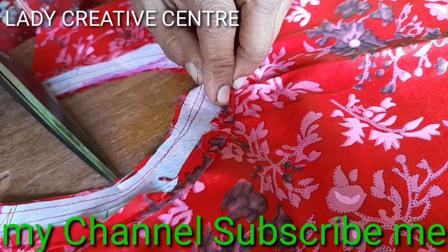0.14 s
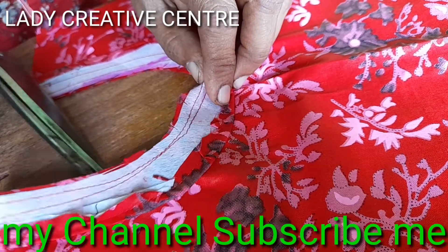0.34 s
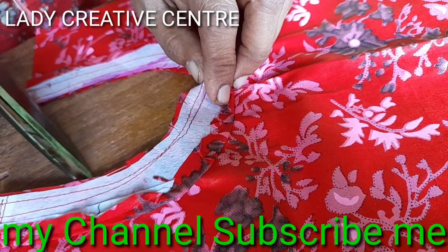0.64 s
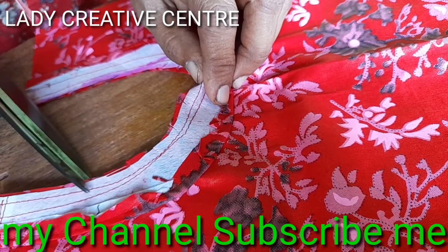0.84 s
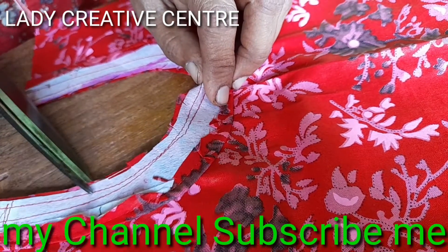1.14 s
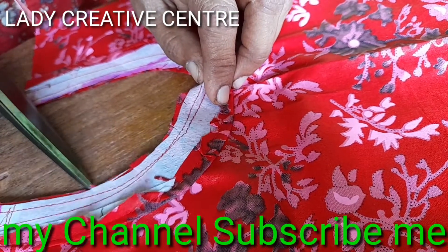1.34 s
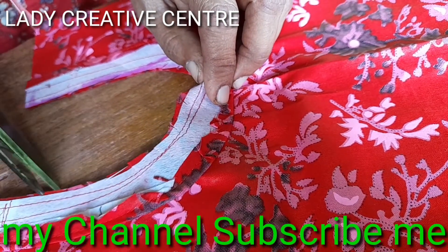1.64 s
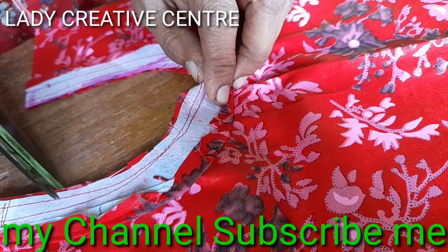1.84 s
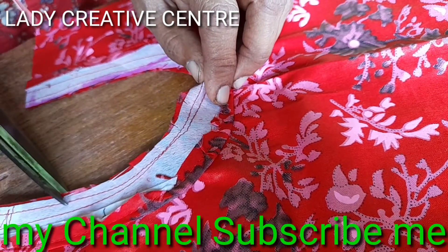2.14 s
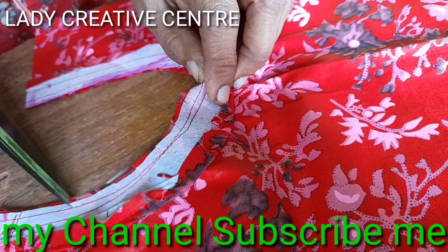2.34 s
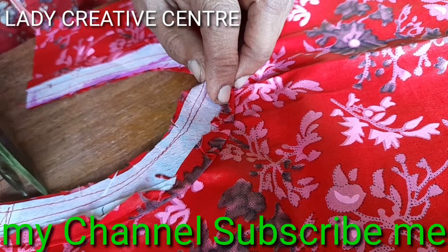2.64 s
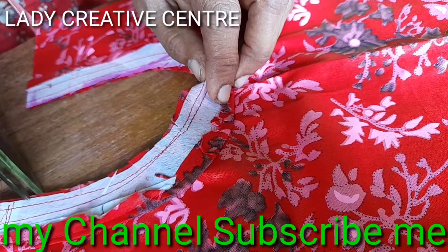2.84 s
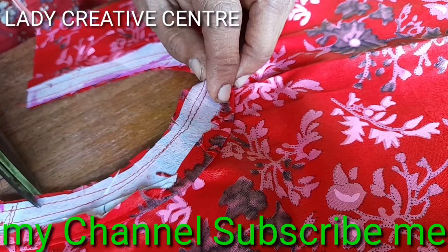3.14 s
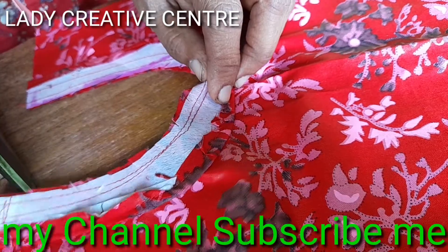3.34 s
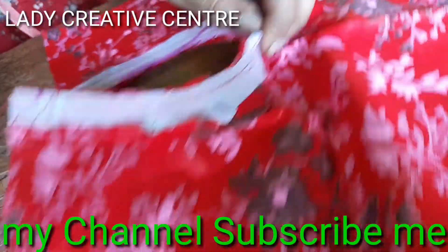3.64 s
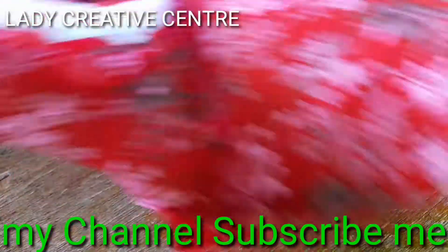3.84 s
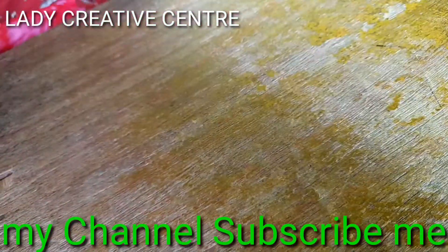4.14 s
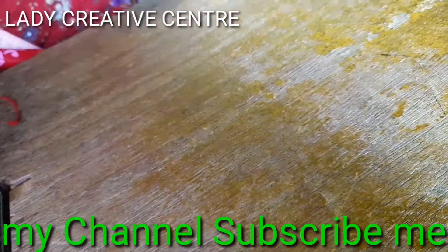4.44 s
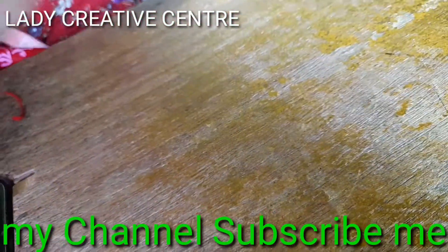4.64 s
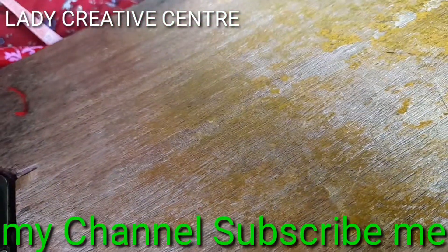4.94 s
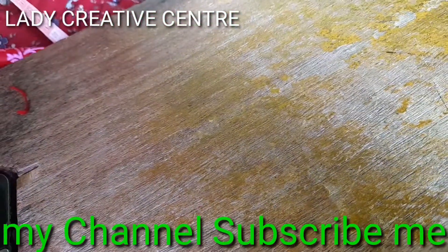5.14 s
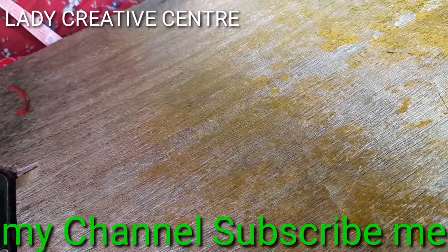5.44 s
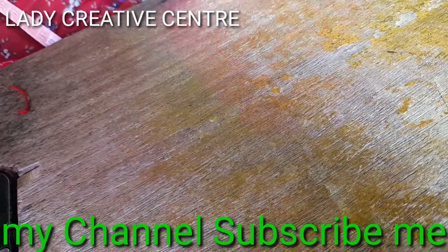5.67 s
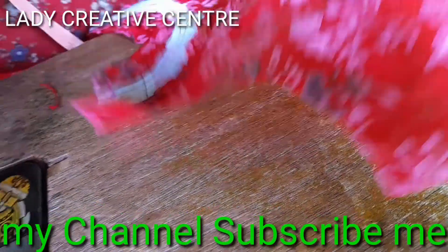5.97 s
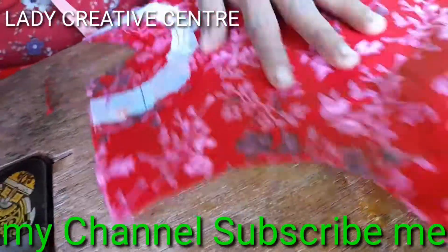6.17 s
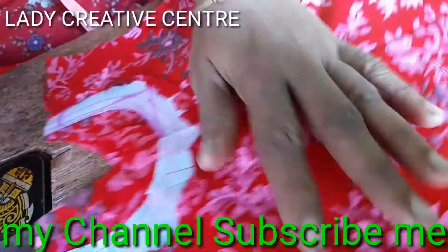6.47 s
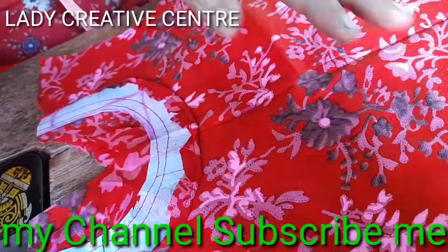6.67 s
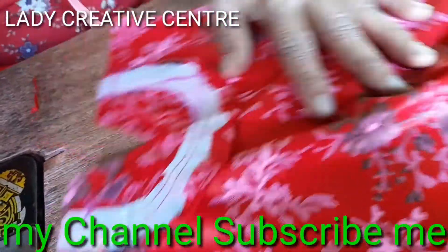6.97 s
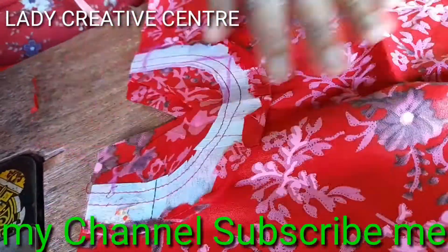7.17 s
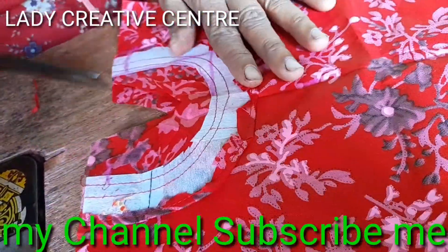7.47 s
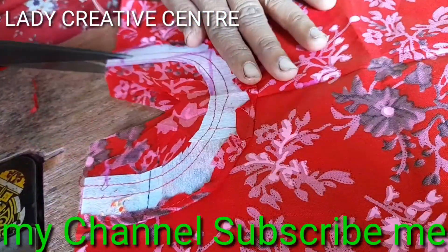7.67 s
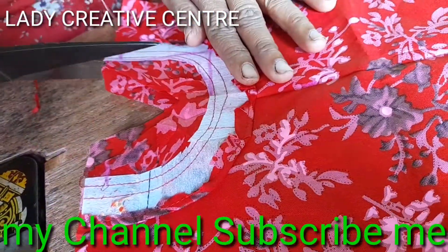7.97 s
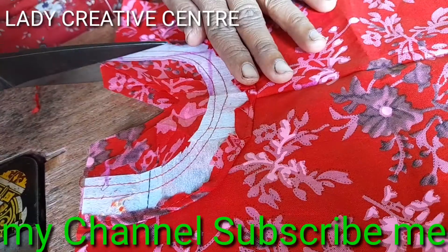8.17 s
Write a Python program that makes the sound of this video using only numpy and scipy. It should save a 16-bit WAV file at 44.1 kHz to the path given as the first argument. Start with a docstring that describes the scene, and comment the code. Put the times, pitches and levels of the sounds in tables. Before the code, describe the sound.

Scissor blades scrape and knock on a resonant wooden table top while cotton threads part in bright crackling bursts. Dull knocks dominate at first, under a thin faint whine; sharper, louder snips come in the middle after a short pause. Then near quiet, fabric brushing and smoothing, and two more snaps with a knock. Heard very close, slightly brighter on the left, in a small room with low rumble.

```python
"""Scissors on a wooden table

A small room, two microphone ports a little apart, the left one brighter; loud knocks overload.
Large scissors snip through cotton on a hollow wooden table; the cloth is flicked and laid out again.
Each closing tears threads in bright bursts of clicks and ends in a knock that rings the modes of the table top.
Hands and steel rub the wood in small slips; cloth rustles in fine grains. A faint whine, a dull hiss,
a low rumble and a few hums lie behind."""
import sys
import numpy as np
from scipy import signal
from scipy.fft import rfft, irfft, next_fast_len
from scipy.io import wavfile
from scipy.ndimage import uniform_filter1d

SR = 44100
rng = np.random.default_rng(int(sys.argv[2]) if len(sys.argv) > 2 else 0)


def put_to_file(sound):
    """Save the sound as 16-bit audio at rate SR, in the file named by the first command-line argument."""
    columns = np.atleast_2d(sound).T  # one column per channel
    safe = np.clip(columns, -1, 1)
    whole_steps = np.round(safe * 32767)
    wavfile.write(sys.argv[1], SR, whole_steps.astype(np.int16))


N = 366471
SECONDS = np.arange(N) / SR


def from_db(db):
    """Decibels to gain."""
    return 10 ** (np.asarray(db) / 20)


def rms_one(x):
    """Scaled to unit rms."""
    return x / np.sqrt(np.mean(x ** 2) + 1e-20)


def in_time(rows):
    """Columns of a curve, drawn as straight lines through every sample."""
    seconds, *columns = np.transpose(rows)
    return [np.interp(SECONDS, seconds, column) for column in columns]


def response(points):
    """Gains of a (pitch_hz, level_db) table on the FFT grid."""
    hz, db = np.transpose(points)
    size = next_fast_len(N)
    grid_hz = np.arange(size // 2 + 1) * SR / size
    return from_db(np.interp(np.log(grid_hz + 1), np.log(hz), db))


def shaped(x, gains):
    """Filtered by gains on the FFT grid."""
    size = next_fast_len(N)
    return irfft(rfft(x, size) * gains, size)[..., :N]


def band(x, low_hz, high_hz):
    """Causal band-pass."""
    return signal.sosfilt(signal.butter(3, [low_hz, high_hz], "band", fs=SR, output="sos"), x)


def drift(rate_hz):
    """Slow random wander with spread 1, drawn every 40 samples and joined by lines."""
    step = 40
    r = np.exp(-2 * np.pi * rate_hz * step / SR)
    noise = rng.standard_normal(N // step + 2002)
    slow = signal.lfilter([1], [1, -2 * r, r * r], noise)[2000:]   # drop the run-in
    return np.interp(np.arange(N) / step, np.arange(len(slow)), rms_one(slow))


def grains(per_s, spread_db):
    """Random clicks of uneven size, other ones in each port; rms 1."""
    sizes = from_db(spread_db * np.minimum(rng.exponential(1, (2, N)), 5))
    signs = rng.choice([-1, 1], (2, N))
    return rms_one(sizes * signs * (rng.random((2, N)) < per_s / SR))


def decay_per_sample(t60_s):
    """Factor per sample that loses 60 dB in t60_s."""
    return from_db(-60 / (t60_s * SR))


def ring(force, hz, t60_s):
    """A resonance: a unit click sets a dying sine of height about 1 ringing."""
    r, w = decay_per_sample(t60_s), 2 * np.pi * hz / SR
    return signal.lfilter([0, np.sin(w)], [1, -2 * r * np.cos(w), r * r], force + 1e-18)


def arch(start_s, length_s):
    """A smooth swell and fall."""
    return np.sin(np.pi * np.clip((SECONDS - start_s) / length_s, 0, 1)) ** 1.5


def at_ports(x, lag_s):
    """One sound at both ports; the right port hears it late."""
    late = np.interp(np.arange(N) - lag_s * SR, np.arange(N), x)
    return np.array([x, late])


PORT_LAG_S, UPPER_LAG_S = 0.000061, 0.00039   # upper modes travel slower across the top

# blades and hands sliding on the wood: start_s, level_db, upper_db (extra for the topmost modes),
# length_s (time scale of the swell and fall)
SLIDES = [(0.025, -35, 16, 0.037), (0.081, -11, -12, 0.026), (0.312, -21, -15, 0.04),
          (0.763, -27.5, -21, 0.06), (0.844, -30.5, -43, 0.02), (1.02, -33.5, 11.5, 0.044),
          (1.132, -31.5, 7, 0.067), (1.203, -11, -8, 0.021), (1.383, -24.5, -26, 0.11),
          (1.689, -26.5, -21, 0.043), (1.933, -20, -33, 0.017), (2.107, -25, -1, 0.041),
          (2.284, -33.5, 9, 0.01), (2.335, -11.5, -17, 0.028), (2.549, -25.5, 5, 0.043),
          (2.856, -26, -3, 0.023), (2.945, -35.5, -31, 0.021), (3.118, -34.5, 15, 0.026),
          (3.242, -21, 6, 0.065), (3.621, -33, 4.5, 0.059), (3.686, -34, 14, 0.021),
          (3.987, -44.5, 19.5, 0.034), (4.263, -45, -37, 0.12), (5.074, -12, 7, 0.022),
          (5.22, -21.5, -14, 0.037), (5.44, -17, 14, 0.015), (6.36, -33.5, -1, 0.059),
          (6.888, -27.5, 10, 0.062), (7.313, -31.5, 4, 0.099), (7.481, -26, -23, 0.023),
          (7.603, -35, -26, 0.027), (7.7, -37, -44, 0.029), (8.187, -47, 16.5, 0.059)]


def sliding(rub_db, height):
    """Rubbing force in time on a mode of this height, 0 lowest to 1 topmost: steady rubbing plus short scuffs."""
    force = from_db(rub_db + 1.4 * height)
    for start_s, level_db, upper_db, length_s in SLIDES:
        start = round(start_s * SR)
        t = np.arange(min(int(4 * length_s * SR), N - start)) / SR / length_s   # in lengths
        swell = (1 - np.exp(-t / 0.47)) * np.exp(-1.5 * t)
        force[start:][:len(t)] += from_db(level_db + 2.0 + upper_db * height) * swell
    return force


# blows on the table, levels relative: start_s, level_db, crack_db (against the level),
# lower_share (of the lower main mode, 0-1), spot_octaves (above 500 Hz, the upper modes favoured by the spot struck)
BLOWS = [(0.134, 0.5, -41.5, 0.36, 0.43), (0.275, -20.5, -48, 0.44, 0.18), (0.785, -31.5, -46, 0.66, 0.16),
         (0.936, -25.5, -43, 0.78, 0.16), (1.038, -30, -30, 0.5, .2), (1.062, -33.5, -24, 0.3, 3.3),
         (1.222, 5, -44.5, 0.64, 0.55), (1.374, -7.5, -37.5, 0.52, 0.32), (2.129, -29, -35.5, 0.84, 0.075),
         (2.206, -21, -33, 0.6, 1.2), (2.353, 0.5, -39.5, 0.21, 0.4), (2.365, -11.5, -47.5, 0.06, .4),
         (2.524, -8.5, -36.5, 0.62, 0.21), (3.007, -28.5, -42.5, 0.57, 0.8), (3.133, -24.5, -40, 0.3, 0.12),
         (3.216, -37, -19, 0.1, 0.64), (3.283, 1, -26, 0.31, 1.2), (3.296, -17, -36, 0.8, 1.4),
         (4.993, -10.5, -29.5, 0.47, 0.6), (5.004, -10, -34, 0.8, 0.3), (5.027, -5, -23, 0.7, 2.06),
         (5.2, -26, -28.5, 0.15, 0.43), (5.45, -17.5, -12, 0.67, 0.5), (5.487, -23.5, -9.5, 0.9, 2.1),
         (5.497, -10.5, -21.5, 0.6, 0.57), (5.533, -12.5, -26, 0.63, 0.32), (6.2, -36, -9, 0.1, 0.43),
         (6.317, -35, -18, 0.5, .35), (6.864, -30.5, -12, 0.15, 0.71), (6.954, -18, -24.5, 0.76, 0.53),
         (7.026, -20, -18, 0.98, 0.59), (7.222, -18.5, -13.5, 0.65, 0.17), (7.3984, -4.5, -22.5, 0, 0.72),
         (7.533, -49.5, -4.5, 0.1, 3.2), (7.781, -49, -6.5, 0.52, 0.74)]
# modes of the table top, levels relative: pitch_hz, struck_db, t60_s (when struck), rubbed_db;
# the second and third carry the knock
TOP_MODES = [(197, -28, 0.39, -30.5), (281.6, -8, 0.15, -25), (323, 1.5, 0.066, -20),
             (426, -16, 0.019, -29), (491, -29.5, 0.083, -31), (567, -25.5, 0.14, -31),
             (637, -27.5, 0.17, -40), (688, -16.5, 0.063, -33.5), (871, -29.5, 0.084, -37),
             (1190, -33, 0.07, -34), (1535, -36, 0.05, -39.5), (2380, -31.5, 0.014, -44)]
CONTACT_S = 0.0014   # length of the soft push of a blow
CLACK_HZ = 1400   # modes from here up answer to the hard steel edge of a blow
THUD_DB = -77   # the whole table gives under a blow, the more the duller it is: against level over crack
SPOT_DB, SPOT_OCTAVES = 7.5, 0.18   # how much, and how widely, the spot favours its modes


def favoured(hz):
    """Each blow's gain in dB for upper modes of this pitch, highest near those its spot favours."""
    distance = np.log2(hz / 500) - np.transpose(BLOWS)[4]
    return SPOT_DB * (np.exp(-(distance / SPOT_OCTAVES) ** 2) - .5)


def table_top(rub_db):
    """Knocks and a scatter of small slips drive the same modes; blows with more crack reach the upper ones."""
    start_s, level_db, crack_db, lower, _ = np.transpose(BLOWS)
    at = np.round(start_s * SR).astype(int)
    lower = np.clip(lower, .02, .98)
    slips = grains(450, 1.1)
    contact = np.hanning(int(CONTACT_S * SR) + 3)
    contact /= contact.sum()
    modes = np.zeros((2, N))   # main and upper
    for k, (hz, struck_db, t60_s, rubbed_db) in enumerate(TOP_MODES):
        height = np.clip(np.log2(hz / 400) / 1.2, 0, 1)
        if k == 1:
            share = lower
        elif k == 2:
            share = 1 - lower
        else:
            share = from_db(favoured(hz) + 5.8 * rng.standard_normal(len(at)))
        blows = np.zeros(N)
        blows[at] = share * from_db(level_db + struck_db + (crack_db + 39) * height + 6)
        pushed = np.convolve(blows, contact)[:N] if hz < CLACK_HZ else blows
        rubbed = from_db(rubbed_db) * slips[k % 2] * sliding(rub_db, height)
        knock = ring(pushed, hz, t60_s)
        rub = ring(rubbed, hz, 0.47 * t60_s)   # a hand on the wood damps it
        modes[int(hz > 450)] += knock + rub
    main, upper = band(modes, 220, 4100)
    thuds = np.zeros(N)
    thuds[at] = from_db(level_db - crack_db + THUD_DB)
    main = main + ring(thuds, 57, 0.09) + ring(thuds, 110, 0.093)
    return at_ports(main, PORT_LAG_S) + at_ports(upper, UPPER_LAG_S)


# colour of the hiss: pitch_hz, level_db (per Hz, relative)
HISS_COLOUR = [(400, -24.5), (700, -5.5), (1030, -11), (1260, -2), (1550, -12.5), (2500, -5.5), (3600, -4),
               (4300, -16), (6200, -23.5), (8500, -47)]
# colour of the rumble: pitch_hz, level_db (per Hz, relative)
RUMBLE_COLOUR = [(25, -25.5), (60, -6.5), (177, -5), (221, -18), (250, -3.5), (320, -34), (400, -60)]


def background(hiss_db, rumble_db):
    """Dull shaped noise that comes and goes, over a lumpy low rumble of noise."""
    hiss = rms_one(shaped(rng.standard_normal((2, N)), response(HISS_COLOUR)))
    rumble = rms_one(shaped(rng.standard_normal((2, N)), response(RUMBLE_COLOUR)))
    hiss_level = from_db(hiss_db + 1.8 * drift(45))
    rumble_level = from_db(rumble_db + 4 * drift(10))
    return hiss_level * hiss + rumble_level * rumble


# colour of cloth fibres and parting threads: pitch_hz, level_db (per Hz, relative)
CLOTH_COLOUR = [(900, -39), (1500, -8.5), (2600, -3.5), (4600, 1.5), (6500, -5.5), (8600, -13.5),
                (9200, -5), (10500, -1), (12500, -5), (14600, -6), (16000, -25)]
# long strokes, blades opening or cloth sweeping: start_s, level_db, length_s, squeak_db (steel against the level)
SWEEPS = [(0.301, -50.5, 0.061, -16), (1.397, -48.5, 0.061, -5), (2.541, -55, 0.091, -5),
          (3.355, -62.5, 0.89, -36), (4.283, -43.5, 0.18, -36.5), (5.151, -59.5, 0.063, 3.5),
          (5.039, -51, 0.42, -30), (5.189, -42.5, 0.099, -30.5), (6.084, -57, 0.46, -28.5),
          (6.861, -36, 0.2, -55.5), (7.318, -50.5, 0.063, -23)]
# resonances of the blades: pitch_hz, width_hz, level_db (relative)
BLADE_BANDS = [(4566, 260, 3), (5440, 370, -6), (9800, 300, -8.5), (13700, 360, -1.5)]


def rustle(rustle_db):
    """Cloth on cloth: dense fine grains that flicker octave by octave; in some strokes steel rubs steel and squeaks."""
    sweep, squeak = from_db(rustle_db), np.zeros(N)
    for start_s, level_db, length_s, squeak_db in SWEEPS:
        stroke = arch(start_s, length_s)
        sweep = sweep + from_db(level_db) * stroke
        squeak += from_db(level_db + squeak_db) * stroke
    slips = grains(3800, 2.9)
    steel = np.zeros((2, N))
    for hz, width_hz, level_db in BLADE_BANDS:
        blade = rms_one(band(slips, hz - width_hz / 2, hz + width_hz / 2))
        steel += from_db(level_db + 4.0 * drift(41)) * blade
    fibres = shaped(grains(6000, 3), response(CLOTH_COLOUR))
    flickering = sum(from_db(3.0 * drift(30)) * band(fibres, hz, 2 * hz) for hz in (1000, 2000, 4000, 8000))
    return sweep * rms_one(flickering) + squeak * steel


# threads parting and cloth snapping taut, levels relative: start_s, level_db,
# middle_db (2-8.5 kHz part against the bright one), t60_s
THREAD_SNAPS = [(0.0304, -22, -6, 0.089), (0.0873, -14, -7.5, 0.056), (0.118, -19, 0, 0.065),
                (1.03, -30, -25, 0.071), (1.057, -17.5, -7, 0.032), (1.1948, -20.5, -5.5, 0.065),
                (1.2109, -28.5, 2, 0.081), (1.941, -36, -8, 0.059), (2.117, -28.5, -1, 0.12),
                (2.161, -36, 2, 0.086), (2.2066, -31.5, -12, 0.063), (2.34, -24.5, -6.5, 0.1),
                (2.379, -30.5, 4, 0.069), (3.122, -32.5, -4, 0.33), (3.241, -31.5, -1.5, 0.078),
                (3.27, -27, -7.5, 0.14), (3.2825, -15.5, 15.5, 0.012), (3.945, -34.5, 1, 0.031),
                (4.4191, -4.5, -7, 0.026), (4.43, -35.5, 5.5, 0.12), (4.586, -29.5, -5, 0.025),
                (4.9945, -4, -6.5, 0.073), (5.0258, 0, -9.5, 0.065), (5.04, -11.5, 4.5, 0.082),
                (5.4417, 0.5, -4, 0.24), (5.489, -7.5, -9, 0.11), (5.498, -2.5, -14, 0.12),
                (5.537, -14.5, -6, 0.091), (6.9391, -0.5, -7, 0.075), (7.138, -15, -3, 0.092),
                (7.189, -26.5, -3, 0.044), (7.3974, -24.5, -10.5, 0.044), (8.216, -49, 4, 0.13)]
SNAP_SWELL_S = 0.0009
FIRST_THREAD_DB = 12   # the thread that opens a snap, against the rms of all clicks, before colouring
PUFF_DB = 3.5   # air from a snap; grows faster than the snap


def snaps():
    """Bursts of thread clicks, their colour shifting, swell and die: a bright part, a duller one and a puff of air."""
    top, middle = np.zeros((2, N))
    for start_s, level_db, middle_db, t60_s in THREAD_SNAPS:
        start = round(start_s * SR)
        t = np.arange(min(int(t60_s * SR), N - start)) / SR
        swell = 1 - np.exp(-(t / SNAP_SWELL_S) ** 2)
        burst = from_db(level_db - 13.5 - 60 * t / t60_s) * swell
        top[start:][:len(t)] += burst
        middle[start:][:len(t)] += burst * from_db(middle_db)
    clicks = grains(7000, 2.7)
    first = ((np.transpose(THREAD_SNAPS)[0] + SNAP_SWELL_S) * SR).astype(int)
    clicks[:, first] = from_db(FIRST_THREAD_DB)
    threads = shaped(clicks, response(CLOTH_COLOUR)) * from_db(3.0 * drift(90))
    bands_hz = 1800 * 1.5 ** np.arange(6)
    threads = sum(from_db(3.5 * drift(35)) * band(threads, hz, 1.5 * hz) for hz in bands_hz)
    bright = top * rms_one(band(threads, 5200, 22000))
    dull = middle * rms_one(band(threads, 2000, 8500))
    air = rms_one(band(rng.standard_normal((2, N)), 40, 230))
    push = np.abs(uniform_filter1d(np.minimum(top, middle), size=1500, origin=700))   # smoothed and late
    return bright + dull + from_db(PUFF_DB) * push ** 1.48 * air


# crowded upper modes of the wood, dying as noise: low_hz, high_hz, level_db (relative), t60_s (held to 0.2 at most)
WOOD_BANDS = [(445.5, 860, 8, 0.25), (800, 1710, 6, 0.2), (1400, 2800, -2.5, 0.12), (2860, 5000, -11, 0.1)]


def wood_tail():
    """A blow also leaves noise that dies band by band, mostly opposite in the two ports."""
    start_s, blow_db, crack_db = np.transpose(BLOWS)[:3]
    at = np.round(start_s * SR).astype(int)
    out = np.zeros((2, N))
    for low_hz, high_hz, level_db, t60_s in WOOD_BANDS:
        hits = np.full(N, 1e-18)
        hits[at] += from_db(blow_db + crack_db + favoured(np.sqrt(low_hz * high_hz)))
        crack = signal.lfilter([1], [1, -decay_per_sample(0.019)], hits)
        tail = signal.lfilter([1], [1, -decay_per_sample(min(t60_s, .2))], hits)
        noise = rng.standard_normal((2, N)) / np.sqrt(2 * (high_hz - low_hz) / SR)   # about rms 1 in the band
        mid, side = band((crack + 0.27 * tail) * noise, low_hz, high_hz)
        out += from_db(level_db) * (mid + 1.54 * side * [[1], [-1]])
    return out


# stretches in which the whine sounds: start_s, end_s, level_db (at the start)
WHINE_STRETCHES = [(0.137, 0.591, -47.5), (0.583, 0.79, -54.5), (0.861, 0.98, -48), (0.97, 1.08, -47.5),
                   (1.1, 1.26, -49), (1.235, 1.422, -67), (2.614, 2.667, -48.5), (2.705, 2.769, -57),
                   (4.04, 4.17, -65.5)]
# its wandering pitch: time_s, pitch_hz
WHINE_CURVE = [(0.14, 2502), (0.21, 2525), (0.4, 2505), (0.63, 2540), (0.79, 2503), (0.87, 2545),
               (0.96, 2514), (1.22, 2511), (1.42, 2460), (2.64, 2517), (2.77, 2495), (4.1, 2580)]
WHINE_HALF_DB = -13.5   # the tone an octave down
WHINE_EDGE_S, WHINE_FADE_DB = 0.038, 2   # rise and fall; loss over a stretch


def whine():
    """A thin sine with a weaker one an octave down; the pitch wanders and each stretch fades."""
    hz, = in_time(WHINE_CURVE)
    phase = 2 * np.pi * np.cumsum(hz) / SR + .35 * drift(12)
    level = np.zeros(N)
    for start_s, end_s, level_db in WHINE_STRETCHES:
        progress = np.clip((SECONDS - start_s) / (end_s - start_s), 0, 1)
        edges = np.clip(np.minimum(SECONDS - start_s, end_s - SECONDS) / WHINE_EDGE_S, 0, 1)
        level += from_db(level_db - WHINE_FADE_DB * progress) * edges
    tone = np.sin(phase) + from_db(WHINE_HALF_DB) * np.sin(phase / 2)
    return level * tone * from_db(2.2 * drift(15))


# a low hum swells now and then: start_s, end_s, pitch_hz, level_db
HUM_SWELLS = [(1.548, 2.073, 191.2, -54), (4.245, 4.4, 154, -52.5), (7.981, 8.205, 196.6, -49.5),
              (8.211, 8.407, 224.5, -48)]


def hums():
    """Each hum is noise in a narrow band."""
    air = rng.standard_normal(N)
    out = np.zeros(N)
    for start_s, end_s, hz, level_db in HUM_SWELLS:
        hum = rms_one(band(air, .95 * hz, 1.05 * hz))
        out += from_db(level_db) * np.sqrt(arch(start_s, end_s - start_s)) * hum
    return out


BOUNCE_DB = -10.5   # each echo


def bounces(x):
    """Hands, cloth and table top send a few echoes within milliseconds, other ones to each port."""
    out = x.copy()
    for port, lags in enumerate((rng.uniform(.0008, 0.0064, (2, 5)) * SR).astype(int)):
        for k, lag in enumerate(lags):
            out[port, lag:] += from_db(BOUNCE_DB) * (-1) ** k * x[port, :-lag]
    return out


ROOM_T60_S, WALL_CUT_HZ, ROOM_DB = 0.35, 22000, -22   # low-pitch decay, wall damping corner, send level


def room(x):
    """Reverberation from eight feedback delays a side, duller on every round."""
    size = next_fast_len(N + SR)
    w = 2 * np.pi * np.arange(size // 2 + 1) / size
    dull = 1 / (1 + 1j * w * SR / (2 * np.pi * WALL_CUT_HZ))
    echo = np.zeros((2, len(w)), complex)
    for k, lag in enumerate((rng.uniform(0.0098, 0.035, 16) * SR).astype(int)):
        loop = from_db(-60 * lag / SR / ROOM_T60_S) * dull * np.exp(-1j * w * lag)
        echo[k % 2] += loop / (1 - loop) * (-1) ** (k // 2)
    return irfft(rfft(x, size) * echo, size)[:, :N]


# hands and blades on the table, and the hiss of the room: time_s, rubbing_db (relative), hiss_db
HANDS_AND_HISS = [(0.0, -47, -59), (0.28, -44.5, -49), (0.64, -61.5, -57.5), (1.34, -48, -59),
                  (1.8, -61.5, -65), (2.41, -48, -67.5), (2.8, -67.5, -64.5), (3.2, -45.5, -63.5),
                  (3.33, -55, -49.5), (4.2, -69, -67), (5.0, -55.5, -57), (5.17, -36.5, -49),
                  (5.48, -55.5, -61), (5.74, -73, -74), (6.14, -70, -75), (6.32, -56, -55),
                  (6.5, -87.5, -70), (7.03, -36, -44), (7.38, -45.5, -59), (7.6, -59.5, -65),
                  (8.31, -61.5, -57.5)]
CALM_DB = -52.5   # rubbing level at which the rustle and rumble levels below hold
RUSTLE_DB, RUSTLE_FOLLOWS = -65.5, 0.91   # the cloth stirs with the hands: level, share of their swing
RUMBLE_DB, RUMBLE_FOLLOWS = -61.5, 0.3   # the rumble rises and falls in step with the rubbing: level, share of its swing


def scene():
    """Table modes, whine and hum are shared by the ports; cloth sounds differ between them."""
    rub_db, hiss_db = in_time(HANDS_AND_HISS)
    swing_db = rub_db - CALM_DB
    bursts = from_db(4.0) * bounces(wood_tail() + snaps())
    cloth = rustle(RUSTLE_DB + RUSTLE_FOLLOWS * swing_db)
    wood = table_top(rub_db + 2.0 * drift(5.4))
    near = wood + at_ports(whine(), PORT_LAG_S) + bursts + cloth
    behind = background(hiss_db, RUMBLE_DB + RUMBLE_FOLLOWS * swing_db) + hums()
    return near + from_db(ROOM_DB) * room(near) + behind


# colour of the left port against the right: pitch_hz, difference_db
PORT_COLOUR = [(60, 8), (300, 2.5), (700, -1.5), (1300, 1), (2400, -1), (4500, 0), (7000, 7), (9500, 15),
               (15000, 9)]
CUTOFF_HZ = 16500   # from here up the filter takes off 95 dB


def record(dry):
    """The ports differ in colour, peaks flatten softly just below full scale, the top is cut."""
    half = np.sqrt(response(PORT_COLOUR))   # half the difference in dB on each port
    heard = shaped(dry, np.array([half, 1 / half]))
    flattened = .94 * heard / (1 + np.abs(heard) ** 6) ** (1 / 6)
    return signal.sosfilt(signal.cheby2(14, 95, CUTOFF_HZ, fs=SR, output="sos"), flattened)


dry = scene()
out = record(dry)
put_to_file(out)
```